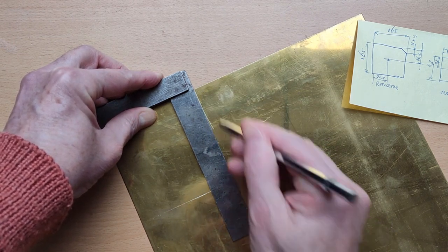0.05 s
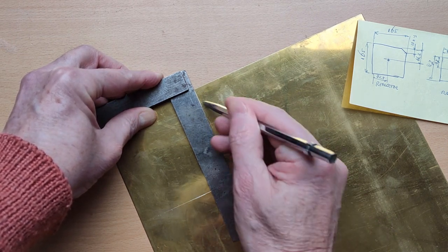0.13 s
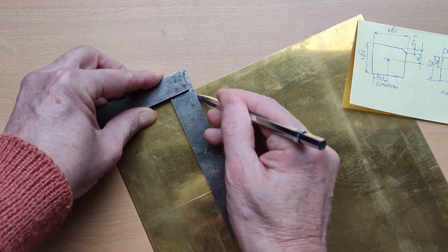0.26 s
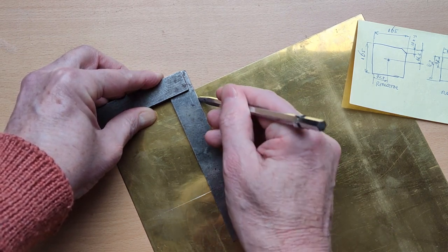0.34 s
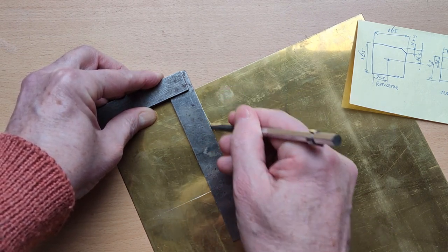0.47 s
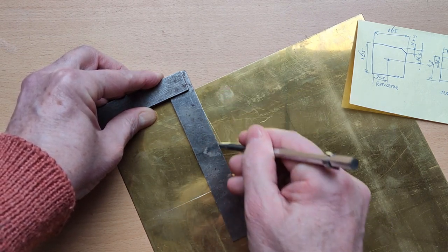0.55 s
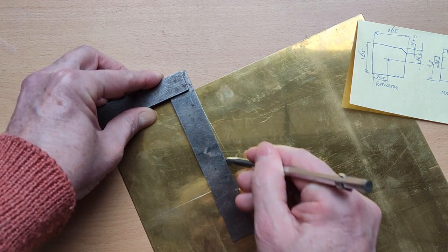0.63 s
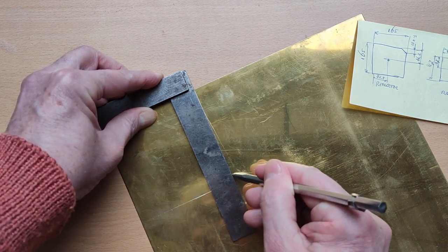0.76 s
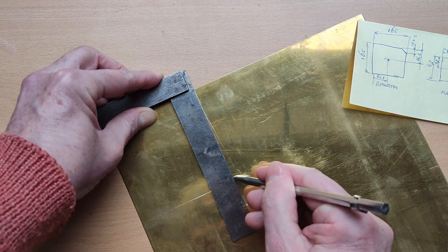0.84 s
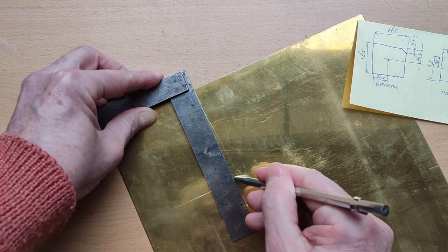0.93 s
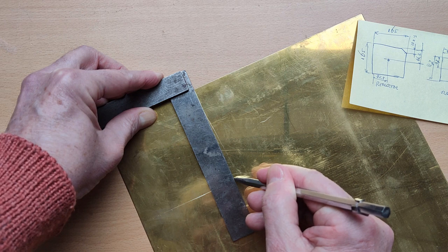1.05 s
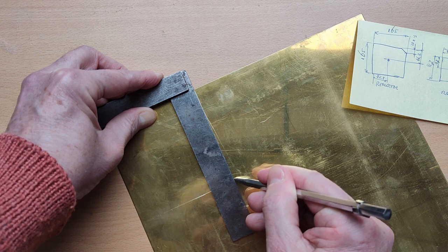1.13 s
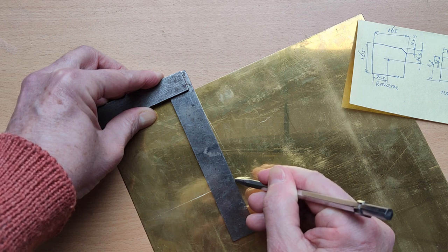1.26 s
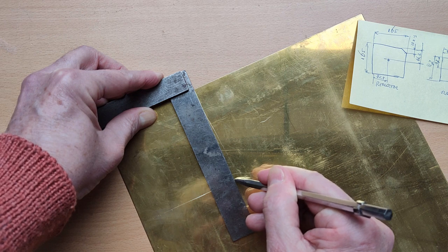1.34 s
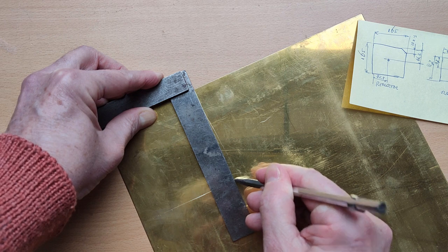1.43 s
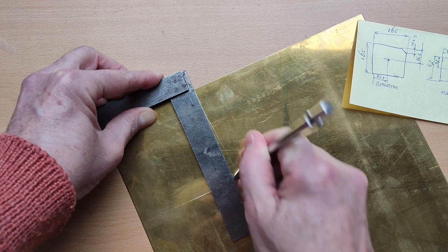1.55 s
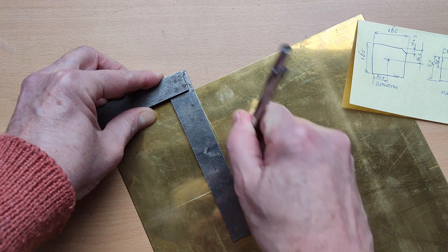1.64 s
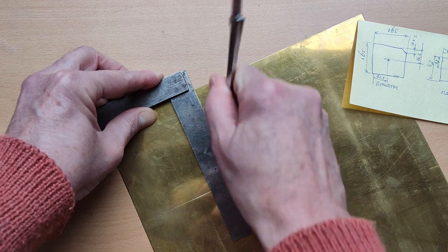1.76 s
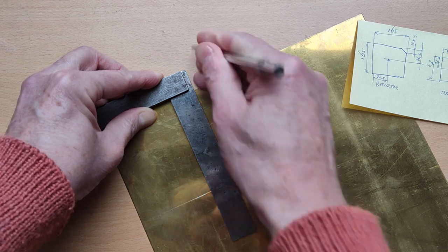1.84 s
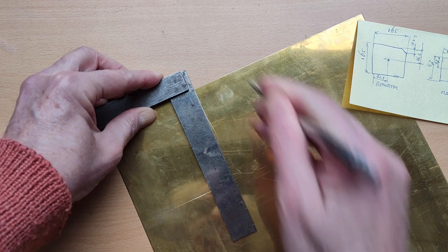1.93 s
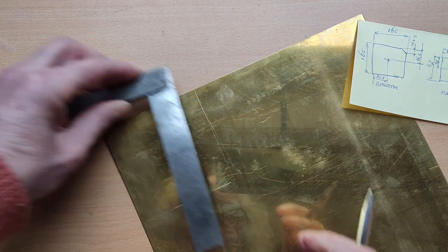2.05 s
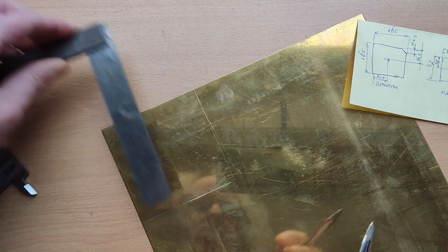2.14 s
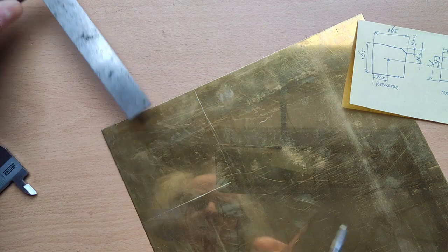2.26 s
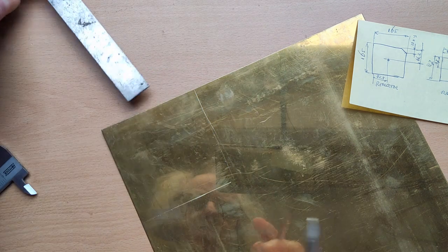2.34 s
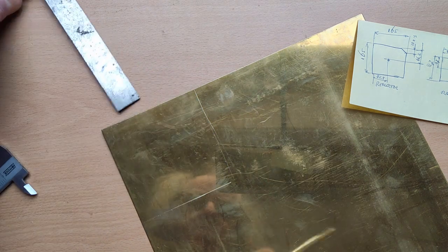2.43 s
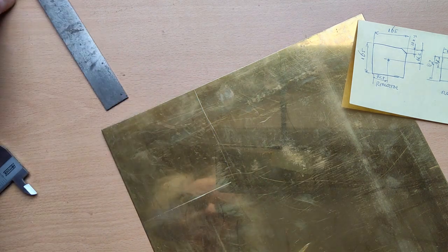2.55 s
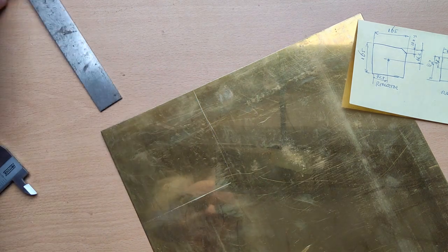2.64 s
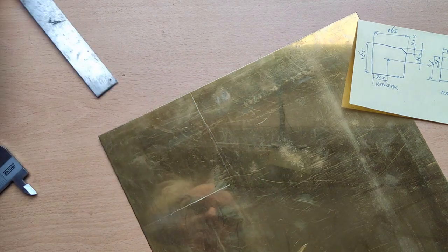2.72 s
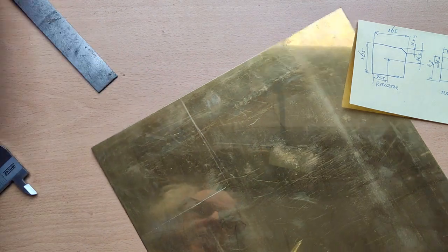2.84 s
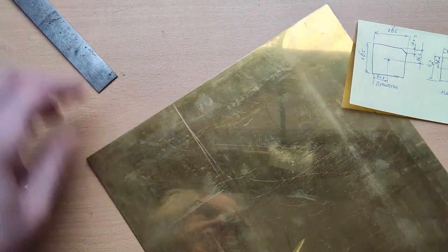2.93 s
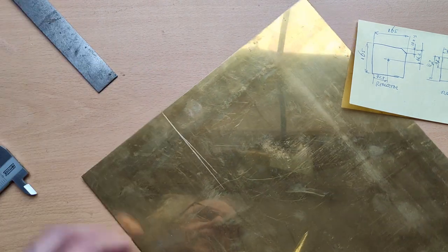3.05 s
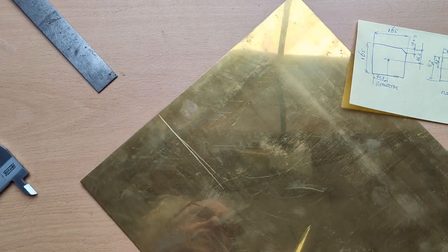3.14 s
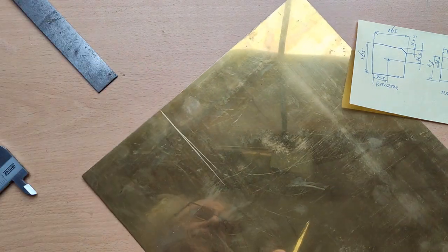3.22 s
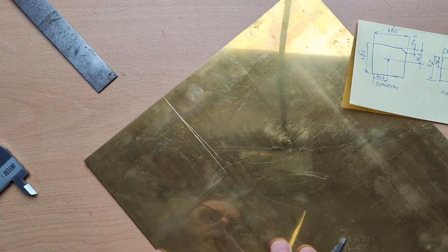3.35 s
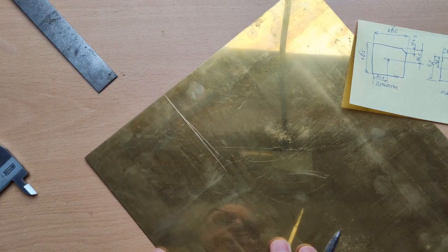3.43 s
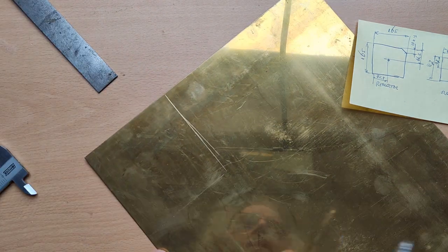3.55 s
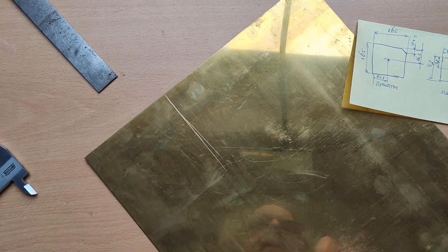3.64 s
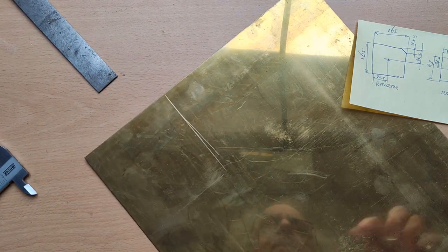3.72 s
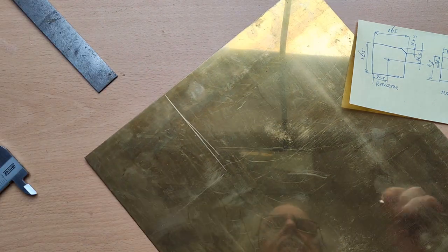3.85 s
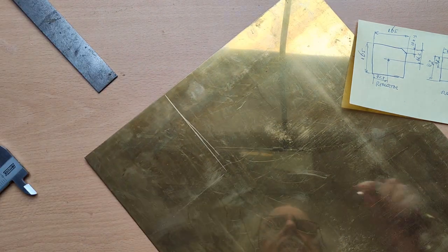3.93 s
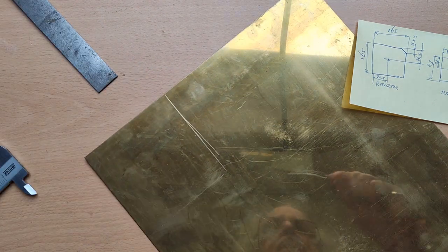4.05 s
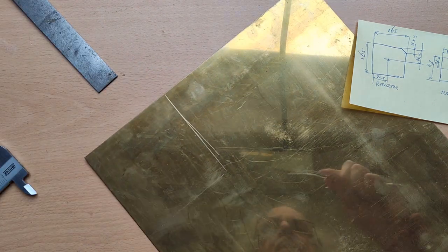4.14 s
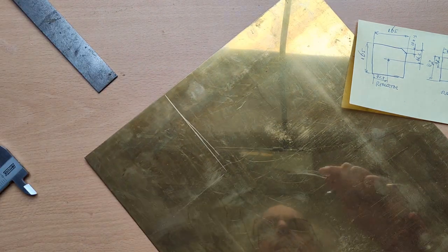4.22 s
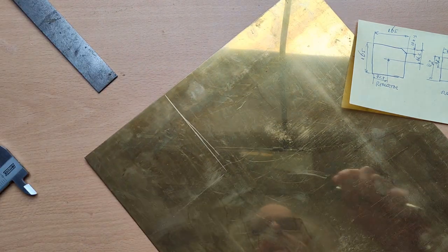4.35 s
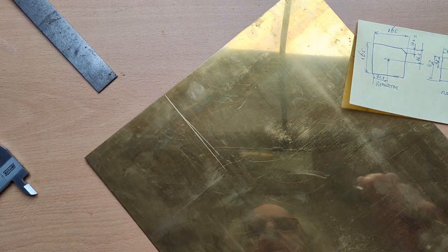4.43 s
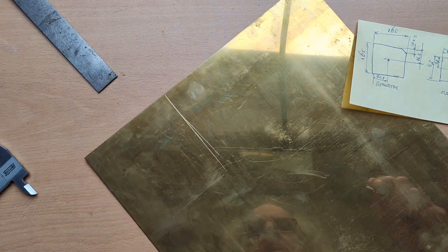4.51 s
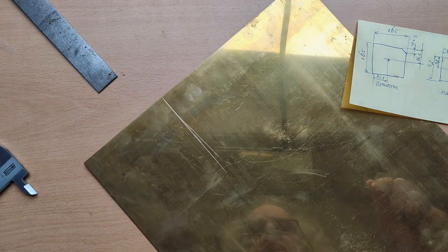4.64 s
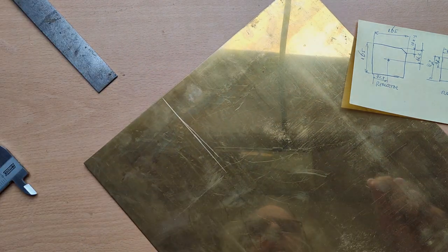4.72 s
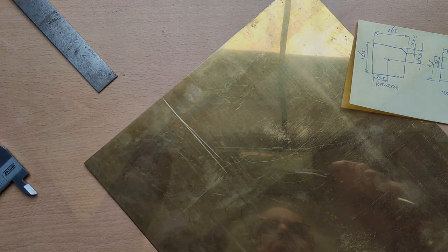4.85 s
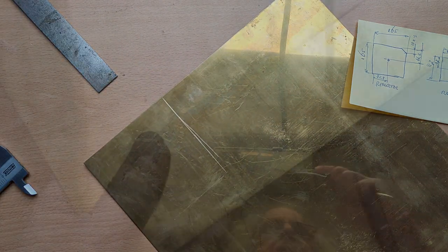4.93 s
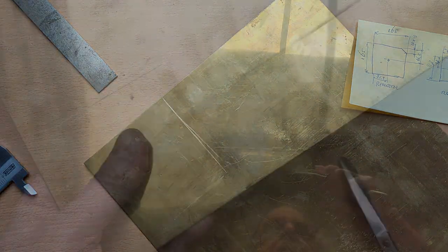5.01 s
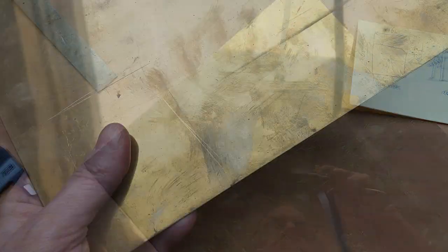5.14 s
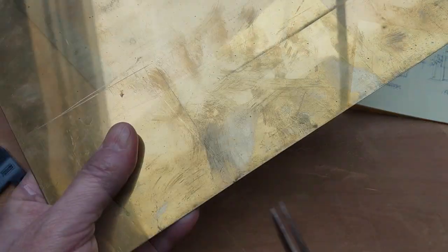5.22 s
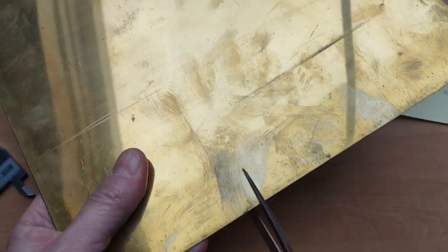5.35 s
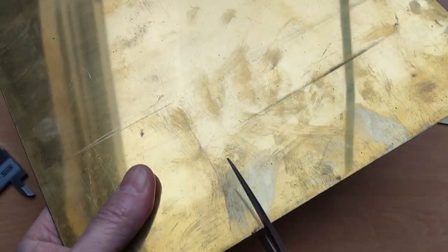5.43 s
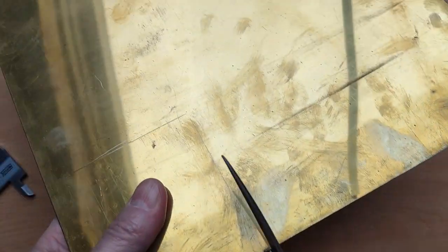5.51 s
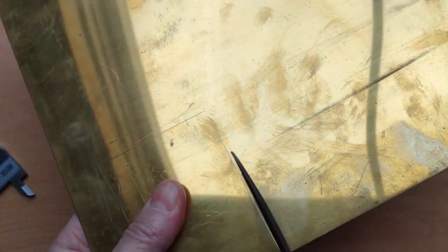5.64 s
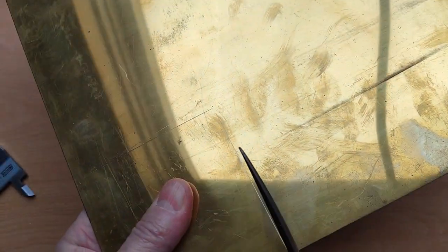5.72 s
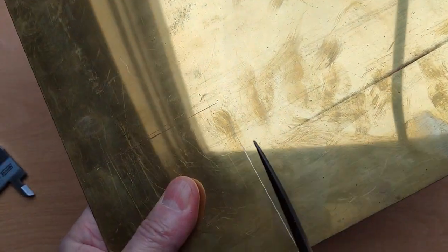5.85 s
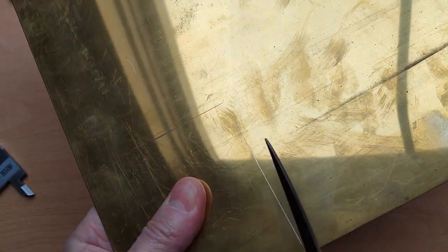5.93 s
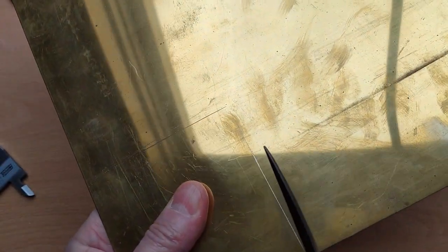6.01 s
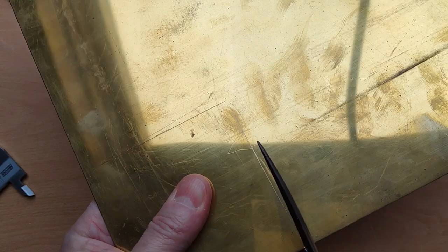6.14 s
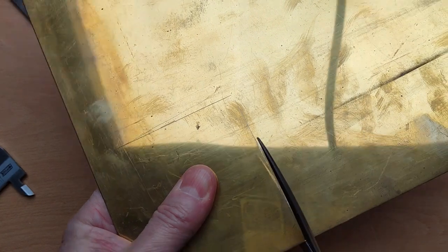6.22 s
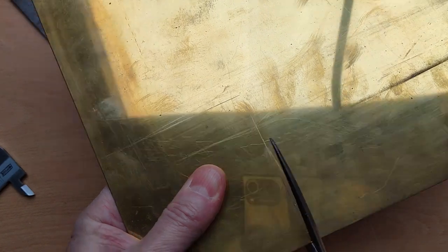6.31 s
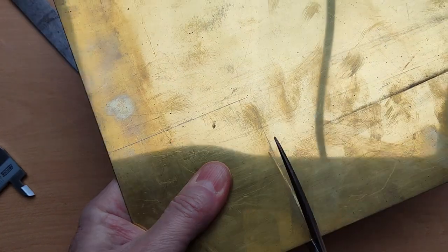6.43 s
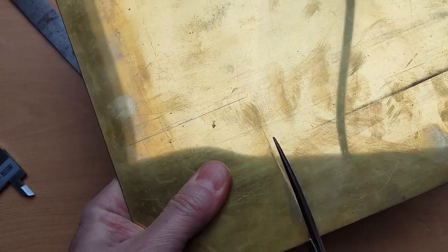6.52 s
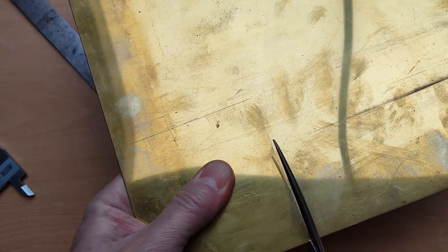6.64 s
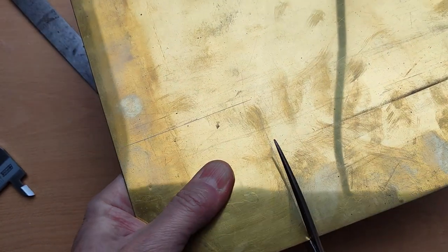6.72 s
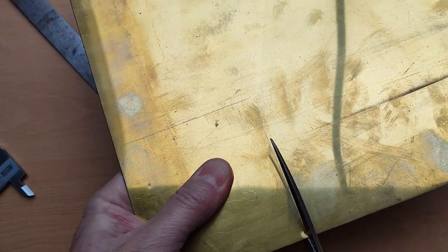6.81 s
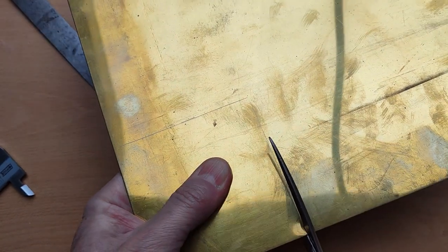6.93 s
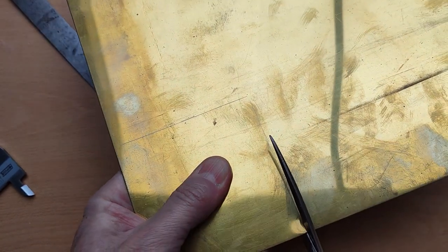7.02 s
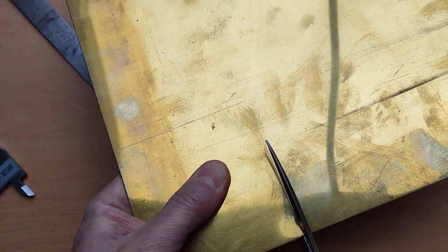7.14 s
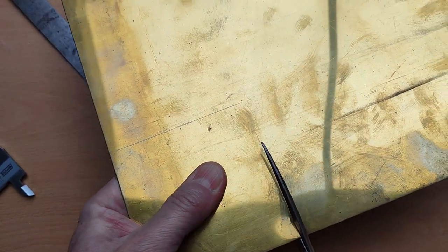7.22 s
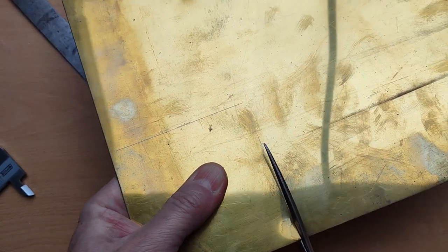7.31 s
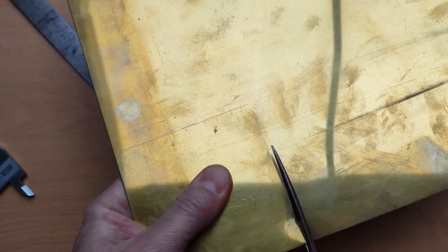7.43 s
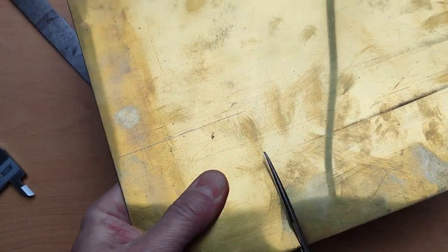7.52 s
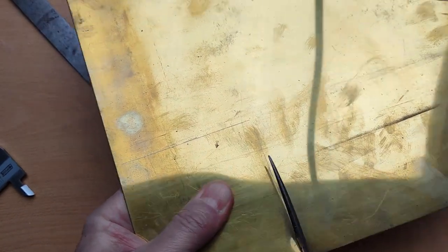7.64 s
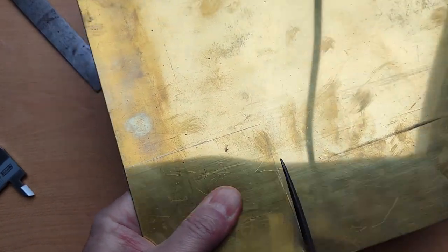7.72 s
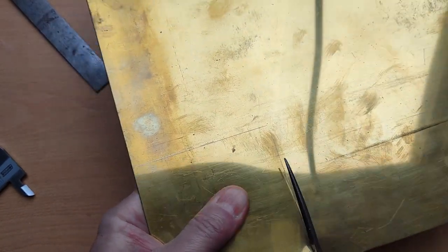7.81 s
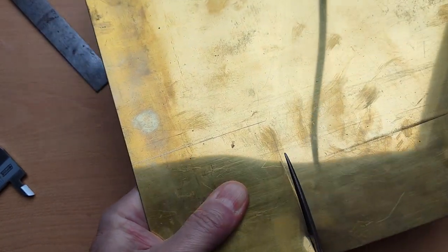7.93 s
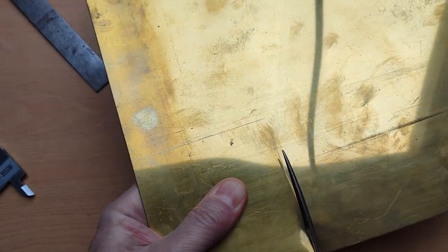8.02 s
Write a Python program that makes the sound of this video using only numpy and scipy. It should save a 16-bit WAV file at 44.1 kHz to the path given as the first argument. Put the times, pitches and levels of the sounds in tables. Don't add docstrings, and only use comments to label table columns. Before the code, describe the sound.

A scriber scratches along brass sheet, a steel square scrapes off and clatters ringing onto a wooden table, then heavy shears drag and tick.

```python
import sys
import numpy as np
from scipy import signal
from scipy.fft import rfft, irfft, next_fast_len
from scipy.io import wavfile
from scipy.ndimage import uniform_filter1d

SR = 44100
rng = np.random.default_rng(int(sys.argv[2]) if len(sys.argv) > 2 else 0)


def inscribe(sig):
    pcm = np.round(np.clip(np.atleast_2d(sig).T, -1, 1) * 32767)
    wavfile.write(sys.argv[1], SR, pcm.astype(np.int16))


def ratio_of_db(decibels):
    return 10 ** (np.asarray(decibels, float) / 20)


N = 355887
RING = 7000

# (low edge [Hz], high edge [Hz])
BANDS = [(60, 800), (800, 4000), (4000, 16500)]
# (frequency [Hz], width [Hz], level [dB])
TABLE = [(222, 25, -11)]
# (frequency [Hz], width [Hz], level [dB])
EDGE = [(1020, 12, 2)]
# (frequency [Hz], width [Hz], level [dB])
SQUARE_FREE = [(360, 90, -5), (468, 45, -3), (1157.5, 36, 1.5), (1667, 76, 2), (2008, 40, -11),
               (2830, 80, -2), (4030, 37, -14.5), (5360, 51, -21), (6100, 45, -14.5), (6190, 85, -13),
               (7960, 90, -20.5), (8423, 36, -17), (10186, 71, -24)]
# (frequency [Hz], level [dB per Hz])
SQUARE_WASH = [(35, -53), (130, -19.5), (515, -2.5), (903, -9.5), (2770, -6.5), (3580, -16), (6000, -18.5),
               (7400, -31.5), (8510, -25), (9570, -35), (16000, -42.5)]
# (frequency [Hz], level [dB per Hz])
BRASS_WASH = [(35, -31), (60, -5), (323, -6), (354, 10.5), (469, 3), (749, 0), (862, -1.5), (3340, -7.5),
              (16000, -30)]
# (frequency [Hz], level [dB per Hz])
LIFT_WASH = [(35, -45.5), (60, -24.5), (207, 9), (862, -3), (2520, -5), (4970, -15.5), (6140, -12),
             (8000, -25.5), (12000, -26.5), (16000, -33.5)]


def rms_one(x):
    return x / np.sqrt(np.mean(x ** 2) + 1e-20)


def at_hz(points, hz):
    points = np.array(points)
    return np.interp(np.log(hz + 1), np.log(points[:, 0]), points[:, 1])


def in_time(spans):
    out = np.zeros((len(spans[0][0]) - 1, N))
    for rows in spans:
        s, *columns = np.transpose(rows)
        at = np.arange(int(s[0] * SR) + 1, min(int(s[-1] * SR), N))
        out[:, at] += ratio_of_db([np.interp(at / SR, s, c) for c in columns])
    return out


def coloured(spectrum, size, low=10, high=20000):
    hz = np.fft.rfftfreq(size, 1 / SR)
    inside = 1 / np.sqrt((1 + (low / (hz + 1)) ** 8) * (1 + (hz / high) ** 8))
    noise = rfft(rng.standard_normal((2, size)))
    return rms_one(irfft(noise * ratio_of_db(at_hz(spectrum, hz)) * inside, size))


def drift(rate_hz):
    knots = rng.standard_normal(400)
    return np.interp(np.arange(N) / SR * rate_hz, np.arange(400), knots)


def strokes(table, colour_db, follow, rise_db, sag_db, release_s, fall_db):
    spans, follow = [], np.array(follow)
    for s, rise_s, hold_s, db, hard_db in table:
        top = db + np.array(colour_db) + hard_db * np.array([-1, 0, 1])
        start = top - rise_db * rise_s * follow
        held = top - sag_db * hold_s * follow
        times = s + np.cumsum([0, rise_s, hold_s, release_s])
        spans.append(np.column_stack([times, [start, top, held, held - fall_db]]))
    return spans


def response(modes, wash, sharp, wash_db, wash_t60, scatter_db, push_s, wander):
    t = np.arange(RING) / SR
    hz, width, db = np.transpose(modes)
    treble_hz = BANDS[2][0]
    hz = hz * (1 + wander * np.where(hz < treble_hz, 1, .3) * rng.standard_normal(len(hz)))
    decay = np.pi * width / np.where(hz < treble_hz, sharp[0], sharp[1])
    strength = ratio_of_db(db + scatter_db * rng.standard_normal(len(hz))) * np.sqrt(decay)
    apart = np.minimum(hz / 1100, 1) * rng.uniform(0.15, 1.9, len(hz))
    turn = 2 * np.pi * hz[:, None] * t
    fade = strength[:, None] * np.exp(-decay[:, None] * t)
    twin = rng.uniform(0, 2 * np.pi, (len(hz), 1))
    fade = fade * (1 + .55 * np.cos(.0008 * twin * turn))
    mids = fade * np.sin(turn)
    sides = fade * apart[:, None] * np.cos(turn)
    out = []
    for (low, high), level_db, t60, rise_s, wide in zip(BANDS, wash_db, wash_t60, push_s, [.35, .9, .8]):
        own = (hz >= low) & (hz < high)
        tone = mids[own].sum(axis=0) + sides[own].sum(axis=0) * [[1], [-1]]
        noise = coloured(wash, RING, low, high)
        noise = (noise[0] + wide * noise[1] * [[1], [-1]]) * ratio_of_db(-60 * t / t60)
        both = (rms_one(tone) + ratio_of_db(level_db) * rms_one(noise)) * (1 - np.exp(-t / rise_s))
        out.append(both / np.abs(both).max())
    return np.array(out)


def blows(table, gain_db, pan_db, **body):
    out = np.zeros((2, N + RING))
    pan = ratio_of_db([[pan_db / 2], [-pan_db / 2]])
    for s, db, weight_db, hard_db in table:
        levels = ratio_of_db(db + np.array([weight_db, 0, hard_db]) + gain_db)
        at = round(s * SR)
        out[:, at:at + RING] += np.einsum("b,bct->ct", levels, response(**body)) * pan
    return out[:, :N]


def rubbing(spans, per_s, spread_db, lumpy_db, **body):
    step = 2600
    sizes = ratio_of_db(spread_db * np.minimum(rng.exponential(1, N), 4)) * rng.choice([-1, 1], N)
    catches = rms_one(sizes * (rng.random(N) < per_s / SR) * ratio_of_db(lumpy_db * drift(45)))
    drive = in_time(spans) * catches
    out = np.zeros((2, N + RING + step))
    for rows in spans:
        for at in range(round(rows[0][0] * SR), round(rows[-1][0] * SR), step):
            answer = response(**body)
            answer /= np.sqrt(np.sum(answer ** 2, axis=(1, 2), keepdims=True) / 2)
            moved = signal.fftconvolve(drive[:, None, at:at + step], answer, axes=2)
            out[:, at:at + step + RING - 1] += moved.sum(axis=0)
    return out[:, :N]


def grit(spans, wash, fine_db, wide, lumpy_db, lumps_per_s):
    gains, out = in_time(spans), np.zeros((2, N))
    first, last = np.flatnonzero(gains[0])[[0, -1]]
    size = next_fast_len(int(last - first))
    shared = rng.standard_normal(200)
    for (low, high), gain, db in zip(BANDS, gains, fine_db):
        mid, side = coloured(wash, size, low, high)
        knots = .7 * (shared + rng.standard_normal(200))
        clumps_db = lumpy_db * np.interp(np.arange(size) / SR * lumps_per_s, np.arange(200), knots)
        hiss = mid + wide * side * [[1], [-1]]
        out[:, first:first + size] += ratio_of_db(db + clumps_db) * gain[first:first + size] * hiss
    return out


def air():
    # (frequency [Hz], level [dB per Hz])
    room_colour = [(12, -26.5), (20, 2), (70, -6), (193, -5), (422, -9), (513, -12.5), (1260, -15.5),
                   (1610, -18), (3630, -29), (12400, -37), (14700, -32.5), (16000, -36.5)]
    # (frequency [Hz], likeness [0-1])
    likeness = [(60, 0.051), (180, 0.31), (550, 0.36), (1650, 0.052), (4970, -0.41), (15000, -0.02)]
    band_db = [-70.5, -69, -77.5, -78.5]
    band_later_db = [-4, 0, 0.9, -4.5]
    size, t = next_fast_len(N), np.arange(N) / SR
    alike = np.clip(at_hz(likeness, np.fft.rfftfreq(size, 1 / SR)), 0, 1)
    edges_hz = [(10, 100), (100, 2300), (2500, 9000), (10000, 13500)]
    out = 0
    for db, later_db, (low, high) in zip(band_db, band_later_db, edges_hz):
        mid, side = rfft(coloured(room_colour, size, low, high))
        pair = np.sqrt(1 + alike) * mid + np.sqrt(1 - alike) * side * [[1], [-1]]
        level_db = db + np.interp(t, (4.5, 4.8, 5.73), [0, 3, later_db])
        out = out + ratio_of_db(level_db) * irfft(pair, size)[:, :N]
    return out


def engine():
    # (time [s], firing rate [Hz], level [dB])
    pull_away = [
        (5.9, 152, -77),
        (6.119, 124.3, -87),
        (6.28, 124.9, -67),
        (6.412, 137, -70),
        (6.598, 149, -66),
        (6.761, 160.9, -68),
        (6.9, 166, -73),
        (7.15, 172.1, -73),
        (7.451, 178.1, -85),
    ]
    s, hz, db = np.transpose(pull_away)
    t = np.arange(N) / SR
    rate, level_db = np.interp(t, s, hz), np.interp(t, s, db)
    boom_hz, boom_width_hz, boom_db = 150, 27, 18
    boom = boom_db * np.exp(-((rate - boom_hz) / boom_width_hz) ** 2) * (t > s[1])
    levels = [level_db - 14.5 + boom, level_db, -78.5 + 0.74 * (level_db - db.max())]
    turn = 2 * np.pi * np.cumsum(rate * (1 + .012 * drift(30))) / SR
    first, second, fourth = [ratio_of_db(each + 4 * drift(25)) for each in levels]
    upper = 1.25 * np.sin(3 * turn) + np.sin(4 * turn) + 1.12 * np.sin(5 * turn)
    running = (t > s[0]) & (t < s[-1])
    tone = first * np.sin(turn) + second * np.sin(2 * turn) + fourth * upper
    return ratio_of_db(2.0) * running * tone * ratio_of_db([[1.5], [-1.5]])


def brass():
    # (start [s], rise [s], hold [s], pressure [dB], hardness [dB])
    brushes = [
        (3.12, 0.033, 0.18, -68, 6.5),
        (3.34, 0.18, 0.013, -66.5, 5.5),
        (3.75, 0.19, 0.05, -64.5, 0),
        (5.26, 0.034, 0.4, -69.5, -0.5),
        (5.79, 0.037, 0.043, -68, 4),
        (7.74, 0.077, 0.101, -71.5, -2),
    ]
    # (time [s], strength [dB], weight [dB], hardness [dB])
    nibbles = [
        (3.42, -75.5, -17, 12.5),
        (3.49, -64.5, 3, 2),
        (6.197, -67, 4, 0.5),
        (6.235, -61.5, -9.5, -2),
        (6.507, -70, 3, -7.5),
        (7.17, -79, 1.5, 7.5),
        (7.33, -76.5, 0, 6),
        (7.77, -63, -18.5, -23),
        (7.937, -61.5, -4, -11),
    ]
    # (frequency [Hz], width [Hz], level [dB])
    sheet_modes = [(700, 160, -11), (1192, 22, 2), (1415, 19, 11), (2035, 19, -9), (2800, 10, -33),
                   (3450, 32, -30), (3750, 53, -22), (4918, 53, -13), (4920, 13, 2.5), (5040, 58, 2),
                   (6270, 64.4, 3), (8300, 46, -33)]
    brushing = dict(colour_db=[-3, -1, -6], follow=[0.4, 1, 1.94], rise_db=37, sag_db=26,
                    release_s=0.056, fall_db=19)
    body = dict(modes=sheet_modes + EDGE, wash=BRASS_WASH, wander=0.0255, scatter_db=0,
                wash_t60=[.08, .1, .08], push_s=[.002, .0005, .0003])
    brush = rubbing(strokes(brushes, **brushing), per_s=2500, spread_db=1.5, lumpy_db=2.5,
                    sharp=[.6, .6], wash_db=[12, 9, 12], **body)
    return brush + blows(nibbles, pan_db=1.0, gain_db=11.0, sharp=[1.2, 1.2], wash_db=[3, -1.5, 6], **body)


def blades():
    # (time [s], strength [dB], weight [dB], hardness [dB])
    feeling = [
        (5.692, -52.5, -5.5, 3),
        (5.714, -52.5, -8, -6),
        (5.776, -64.5, 0, -9),
        (5.827, -59.5, -3.5, 0),
        (5.842, -58.5, -6, -5.5),
        (5.862, -61.5, -8, -8),
        (7.772, -72.5, -9.5, -15),
        (7.79, -76, -5.5, -16),
        (7.94, -66, 6, -10),
        (7.955, -68.5, 8, -11),
    ]
    # (frequency [Hz], width [Hz], level [dB])
    lifted_modes = [(753, 46, 0), (1188, 9.9, -2.5), (1500, 24, -4.5), (2028, 22, -6.5), (3290, 17, -4.5),
                    (3880, 41, -3.5), (5000, 26, -12), (5300, 44, -19), (6200, 50, -16), (7000, 35, -22),
                    (8300, 54, -12)]
    return blows(feeling, pan_db=1.5, gain_db=9.0, modes=lifted_modes, wash=BRASS_WASH, sharp=[1.3, 1.2],
                 wash_db=[-6, -6, -1], wash_t60=[.08, .1, .1], scatter_db=0, wander=0.0063,
                 push_s=[.001, .0004, .0003])


def shears():
    # (start [s], rise [s], hold [s], pressure [dB], hardness [dB])
    drags = [
        (4.835, 0.0127, 0.017, -47, -3.5),
        (4.9, 0.029, 0.0083, -56.5, -5.5),
        (5.015, 0.025, .002, -53, -2),
        (5.066, 0.042, 0.021, -51.5, -5.5),
        (5.1, 0.025, 0.023, -51.5, 7),
        (5.145, 0.0125, 0.044, -48.5, 2),
        (5.2, 0.0047, 0.0089, -55, 5),
    ]
    # (time [s], strength [dB], weight [dB], hardness [dB])
    knocks = [(4.811, -47.5, 10, -5), (4.824, -34.5, -7.5, 0), (4.845, -43.5, -2, -10),
              (4.858, -42, -7, -15.5), (4.912, -49, 1, -25), (4.92, -45, -2.5, -21),
              (4.987, -42.5, -3.5, -12), (5.069, -67, 13, -15), (5.09, -59, 7, -13), (5.1071, -57, 8, -12),
              (5.1151, -47.5, 10, -9.5), (5.1246, -50, -3, -4), (5.138, -55, 6, -10), (5.1585, -50, -8, -4),
              (5.2034, -48.5, -5, -6)]
    # (frequency [Hz], width [Hz], level [dB])
    shear_modes = [(432, 22.6, 7.5), (652, 75, 9.5), (1048, 63, 0.5), (1340, 130, -8.5), (1546, 58, -2.5),
                   (2040, 36, -4.5), (2430, 45, -5.5), (3000, 66, -26), (3100, 210, -30), (3950, 220, -13),
                   (6100, 150, -31), (5617, 77, -17), (6560, 130, -26), (7930, 290, -31), (10910, 64, -26)]
    # (frequency [Hz], level [dB per Hz])
    shear_wash = [(35, -58), (60, -17), (301, -54), (427, -0.5), (715, -5.5), (903, -63), (1060, -8.5),
                  (1400, -12.5), (2200, -16.5), (2900, -20), (4100, -19.5), (6500, -27.5), (16000, -44)]
    dragging = dict(colour_db=[2.5, 0, -8], follow=[.55, 1.05, 1.05], rise_db=400, sag_db=125,
                    release_s=.035, fall_db=28)
    spans = strokes(drags, **dragging)
    body = dict(modes=shear_modes, wash=shear_wash, sharp=[1.3, 1.2], wash_db=[-8, -4, -3],
                wash_t60=[.08, .07, .06], wander=0.0264, scatter_db=4, push_s=[.001, .0005, .0003])
    drag = rubbing(spans, per_s=2500, spread_db=3, lumpy_db=1.2, **dict(body, wash_db=[-8, -4, 6])) * ratio_of_db(-2)
    fine = grit(spans, shear_wash, fine_db=[-14, -7, -3], wide=.7, lumpy_db=4.5, lumps_per_s=93)
    return drag + fine + blows(knocks, pan_db=0.6, gain_db=7.5, **body)


def scriber():
    # (start [s], rise [s], hold [s], pressure [dB], hardness [dB])
    lines = [
        (.5, 0.0992, 0.085, -53, 0),
        (.68, 0.044, 0.21, -55, -1),
        (.98, 0.065, 0.0081, -72.5, -3),
    ]
    # (start [s], rise [s], hold [s], pressure [dB], hardness [dB])
    palm = [
        (4.45, 0.085, 0.015, -83.5, 0.019),
    ]
    # (time [s], strength [dB], weight [dB], hardness [dB])
    tip = [
        (.695, -39, -25, -12),
        (0.73, -48, 9.5, -5),
        (.779, -58, -6, -1),
    ]
    # (time [s], strength [dB], weight [dB], hardness [dB])
    thuds = [
        (.002, -56, 1.1, -22),
        (2.113, -74, 14, -9.5),
        (3.577, -74.5, 23.5, -7),
    ]
    # (frequency [Hz], width [Hz], level [dB])
    scriber_modes = [(202.6, 33.7, 0.5), (340, 30, -5), (590, 190, 5), (1930, 73, -21), (2750, 50, -25),
                     (6100, 78, -20)]
    # (frequency [Hz], level [dB per Hz])
    scriber_wash = [(60, -25), (149, -51), (202, 0), (862, -21), (2400, -29), (3500, -35.5), (6200, -34),
                    (7200, -40), (16000, -43.5)]
    ploughing = dict(colour_db=[4, -6, -16.5], follow=[1, 1.53, 0.92], rise_db=213, sag_db=9.5,
                     release_s=0.05, fall_db=35)
    pressing = dict(colour_db=[25.5, -4, -12.5], follow=[1.54, 0.077, .1], rise_db=250.5, sag_db=61,
                    release_s=0.18, fall_db=17.5)
    spans = strokes(lines, **ploughing)
    body = dict(modes=scriber_modes, wash=scriber_wash, sharp=[.8, .8], wash_db=[1.5, 10.5, 3],
                wash_t60=[.025, .012, .03], scatter_db=4, wander=0.023, push_s=[.003, .0005, .0003])
    rubbed = dict(body, wash_db=[1.5, 1, -5], wash_t60=[.03, .06, .06])
    soft = dict(body, modes=TABLE, wash_db=[-9, 8, 1.5], push_s=[.014, .001, .001])
    line = rubbing(spans + strokes(palm, **pressing), per_s=6000, spread_db=3, lumpy_db=1.2, **rubbed)
    line = line + grit(spans, scriber_wash, fine_db=[-9, 2, -1], wide=0.83, lumpy_db=1.83, lumps_per_s=90)
    landing = blows(tip, pan_db=-1, gain_db=3.5, **body)
    return line + landing + blows(thuds, pan_db=0, gain_db=2.5, **soft)


def ticks():
    # (time [s], strength [dB], weight [dB], hardness [dB])
    taps = [
        (.361, -46, -10, -2),
        (.385, -55, -3, 0),
        (.437, -62, -13, -2),
    ]
    # (time [s], strength [dB], weight [dB], hardness [dB])
    edge_touches = [
        (2.156, -55.5, 2.5, -17),
        (2.174, -46.5, -8, -19.5),
        (6.197, -49.5, -18, -19.5),
    ]
    # (time [s], strength [dB], weight [dB], hardness [dB])
    bumps = [
        (4.81, -54.5, 20, -10.5),
    ]
    # (frequency [Hz], width [Hz], level [dB])
    tapped_modes = [(397, 110, 0), (1010, 140, -2), (2490, 60, 0), (5180, 26, -4), (6060, 24, -2),
                    (7420, 47, -14), (7850, 30, -10), (8340, 31, -11), (9090, 51, -18), (11700, 97, -3)]
    # (frequency [Hz], width [Hz], level [dB])
    edge_modes = [(530, 120, -2), (1056, 38, 5), (1800, 54, -17), (2160, 48, -15), (2570, 55, -18),
                  (2800, 57, -22), (5320, 160, -30), (6170, 120, -29)]
    # (frequency [Hz], width [Hz], level [dB])
    handle_modes = [(340, 84, 6), (446, 80, -10), (1000, 200, -6), (5010, 400, -12)]
    touch = dict(wash=LIFT_WASH, sharp=[1.1, 1.1], wash_t60=[.08, .11, .1], scatter_db=0, wander=.003,
                 push_s=[.002, .001, .0005])
    wood = dict(touch, push_s=[.0006, .0005, .0005])
    tapped = blows(taps, pan_db=0.5, gain_db=1.5, modes=tapped_modes, wash_db=[0, -1.5, -3], **touch)
    bump = blows(bumps, pan_db=0.5, gain_db=1.0, modes=handle_modes, wash_db=[-8, 0, 0], **wood)
    left = blows(edge_touches, pan_db=4.0, gain_db=3.5, modes=edge_modes, wash_db=[-5, -6, 0], **touch)
    return tapped + bump + left


def nudges():
    # (time [s], strength [dB], weight [dB], hardness [dB])
    snags = [
        (2.79, -59, -9, -10),
        (2.907, -52, -5.5, 2.5),
        (2.925, -56, -6, 2),
    ]
    return blows(snags, pan_db=0.5, gain_db=2.0, modes=SQUARE_FREE, wash=SQUARE_WASH, sharp=[1.8, 1.6],
                 wash_db=[-6, -12, -10], wash_t60=[.08, .07, .06], scatter_db=3.0, wander=.004,
                 push_s=[.003, .002, .002])


def slide():
    # (start [s], rise [s], hold [s], pressure [dB], hardness [dB])
    pushes = [
        (2.742, 0.0018, 0.013, -67.5, -7),
        (2.772, 0.016, 0.043, -60.5, 4),
        (2.857, .01, 0.08, -55.5, 4.5),
    ]
    pushing = dict(colour_db=[-4.5, -1, -17.5], follow=[1.01, 1.01, 1.01], rise_db=147, sag_db=11.5,
                   release_s=0.044, fall_db=6)
    return rubbing(strokes(pushes, **pushing), per_s=5000, spread_db=.8, lumpy_db=.8,
                   modes=SQUARE_FREE, wash=SQUARE_WASH, sharp=[2.0, 1.9], wash_db=[-3, -11, -8],
                   wash_t60=[.08, .07, .06], scatter_db=1.2, wander=.003, push_s=[.002, .0006, .0004])


def lift():
    # (start [s], rise [s], hold [s], pressure [dB], hardness [dB])
    scrapes = [
        (1.85, .12, 0.044, -41, 2.5),
        (2.154, 0.03, 0.0012, -60.5, -16.5),
    ]
    # (time [s], strength [dB], weight [dB], hardness [dB])
    pull_ticks = [
        (1.862, -55.5, 6.5, -8),
        (1.945, -52, 15.5, 11),
        (1.899, -56, -3, 2),
        (1.975, -54, -12, 0),
        (1.99, -46, -15, 11),
        (2.002, -38.5, -18, 7),
        (2.158, -67, 18, -15),
        (2.174, -65, 17, -14),
    ]
    # (frequency [Hz], width [Hz], level [dB])
    on_brass_modes = [(210, 95, 0), (1910, 77, 13), (2504, 60, 16), (4500, 72, -26), (5000, 47, -13),
                      (5970, 51, 23), (6440, 53, -23.5), (10200, 150, -28), (11900, 48, 10)]
    scraping = dict(colour_db=[-9, -2.5, -9], follow=[0.17, 1.02, 1.18], rise_db=254, sag_db=44,
                    release_s=.025, fall_db=17)
    body = dict(modes=on_brass_modes + EDGE, wash=LIFT_WASH, wash_db=[-1.5, 3, 4], scatter_db=4,
                push_s=[.003, .0015, .001], wander=0.025)
    scrape = rubbing(strokes(scrapes, **scraping), per_s=6000, spread_db=3, lumpy_db=1.2,
                     sharp=[.9, 1.2], wash_t60=[.06, .05, .04], **body)
    return scrape + blows(pull_ticks, pan_db=1.5, gain_db=2.5, sharp=[1.2, 1.5],
                          wash_t60=[.08, .11, .12], **body)


def square():
    # (time [s], strength [dB], weight [dB], hardness [dB])
    clatter = [
        (2.572, -36.5, -7.5, 0.5),
        (2.599, -27.5, -7, -4.5),
        (2.6137, -25, -6.5, 1),
        (2.6356, -25.5, -12, 2.5),
    ]
    # (time [s], strength [dB], weight [dB], hardness [dB])
    settle = [
        (2.655, -21.5, -2, -17.5),
        (2.674, -22.5, -11.5, -1.5),
    ]
    # (time [s], strength [dB], weight [dB], hardness [dB])
    tipping = [
        (2.947, -33.5, -8, -0.5),
    ]
    # (time [s], strength [dB], weight [dB], hardness [dB])
    drop = [
        (2.9665, -9.5, -11.5, -9.5),
        (3.003, -28.5, -11, 0),
    ]
    # (frequency [Hz], width [Hz], level [dB])
    rocking_modes = [(546, 25, -3), (1057, 25, -9), (1635, 10, -4), (1904, 20, -11), (2300, 110, -17.5),
                     (2786, 83, -0.5), (3850, 16, -14), (4330, 54, -7), (4970, 49, -14), (5320, 33, -4),
                     (5990, 53, -2), (6200, 29, -5), (7750, 55, -23), (8320, 30, -8), (9140, 70, -38),
                     (8500, 49, -34), (10180, 32, -19.5), (10600, 58, -24), (13000, 46, -20.5),
                     (14100, 290, -39), (15510, 59, -35)]
    # (frequency [Hz], width [Hz], level [dB])
    flat_modes = [(517, 40, -1), (1130, 220, -2), (1550, 27, 0.5), (1990, 70, -0.5), (2500, 140, -12.5),
                  (3424, 34, -9.5), (4000, 44, -14.5), (4243, 32, -17), (1937, 33, 0), (6140, 24, -5.5),
                  (8310, 44, -7), (8880, 61, -35.5), (10647, 45, -21.5), (10814, 35, -18.5), (385, 43, -6),
                  (13000, 35, -26), (14300, 50, -35.5), (285, 93, -5), (15100, 110, -38.5)]
    touch = dict(wash=SQUARE_WASH, wash_t60=[.14, .13, .1], push_s=[.002, .0006, .0004], pan_db=0.5)
    loose = dict(touch, gain_db=7, modes=rocking_modes + TABLE, sharp=[1.1, 3.6], wash_db=[-3, -4, -11],
                 scatter_db=3.0, wander=0.0093)
    lying = dict(loose, modes=flat_modes + TABLE, sharp=[.8, 2.6], scatter_db=1.2)
    on_end = dict(loose, modes=SQUARE_FREE + rocking_modes[9:10], sharp=[1.6, 3.0])

    rocking = blows(clatter, **loose)
    bright = signal.sosfiltfilt(signal.butter(4, 3500, "high", fs=SR, output="sos"), rocking)
    stilled = np.arange(N) / SR > settle[0][0]
    rocking = rocking - bright * (1 - ratio_of_db(-19)) * stilled

    flat = blows(drop, gain_db=8.5, modes=flat_modes + TABLE, sharp=[1.1, 1.8], wash_db=[-3, -1.5, -8.5],
                 scatter_db=0, wander=0.0015, **touch)
    return rocking + blows(settle, **lying) + flat + blows(tipping, **on_end)


def skips():
    # (skip [s], sound whole again [s])
    skip_spans = [
        (.948, .98),
        (2.03, 2.1),
        (2.197, 2.3),
        (2.698, 2.94),
        (2.741, 2.94),
        (3.031, 3.3),
        (3.072, 3.3),
    ]
    skip_loss_db = [-9, -10.5, 0, -15, -14, -16.5, -15]
    t, db = np.arange(N) / SR, np.zeros(N)
    for (start, end), lost_db in zip(skip_spans, skip_loss_db):
        db += lost_db * ((t > start) & (t < end))
    return uniform_filter1d(ratio_of_db(db), size=40)


def scene():
    gain = skips()
    ringing = scriber() + lift() + square()
    dull = signal.sosfilt(signal.butter(2, 1300, fs=SR, output="sos"), ringing)
    whole = gain ** 1.2
    cut_short = ringing * whole + dull * (np.sqrt(whole) - whole) * ratio_of_db(9.5)
    background = air() + engine()
    handling = brass() + blades() + shears() + ticks() * gain + nudges() + slide()
    return background + handling + cut_short


def low_pass(x):
    return signal.sosfilt(signal.butter(12, 15830, fs=SR, output="sos"), x)


def record(dry):
    rounded = 1.6 * np.tanh(dry / 1.6)
    return low_pass(rounded)


dry = scene()
out = record(dry)
inscribe(out)
```